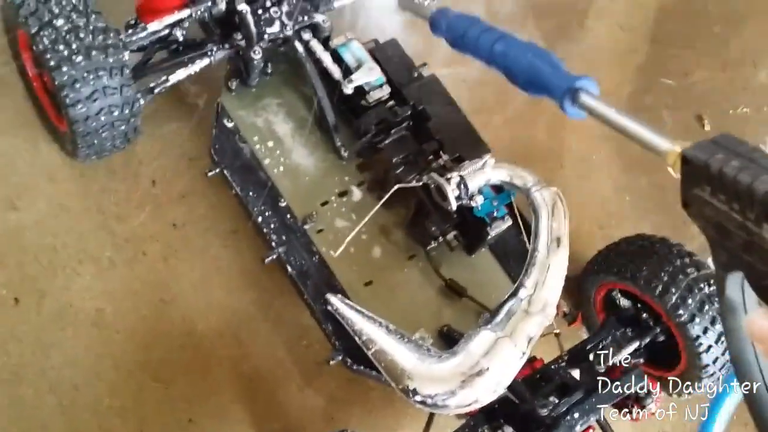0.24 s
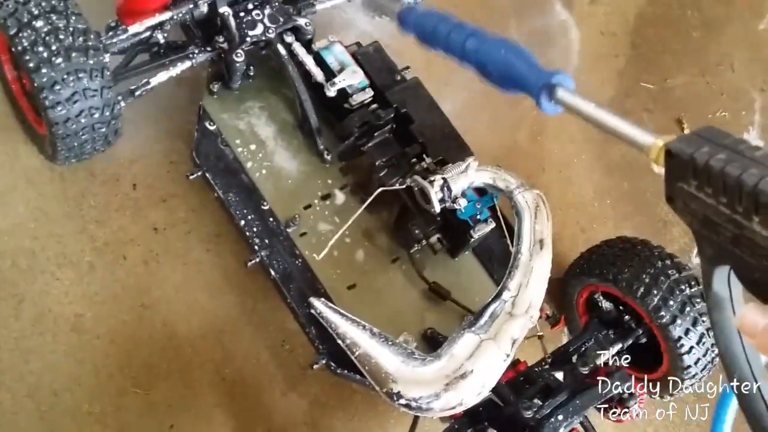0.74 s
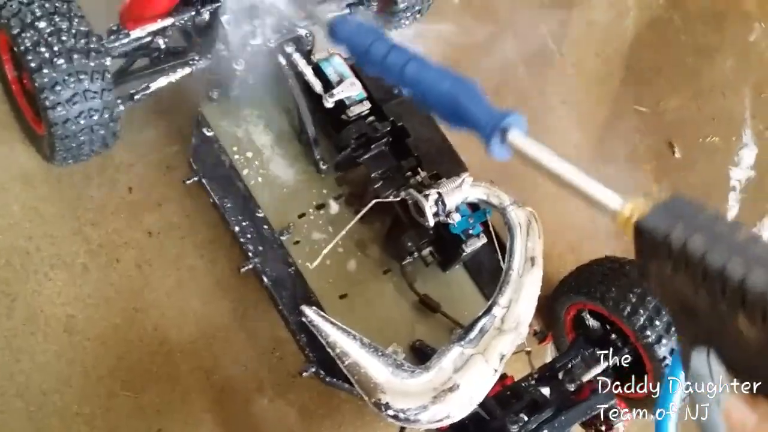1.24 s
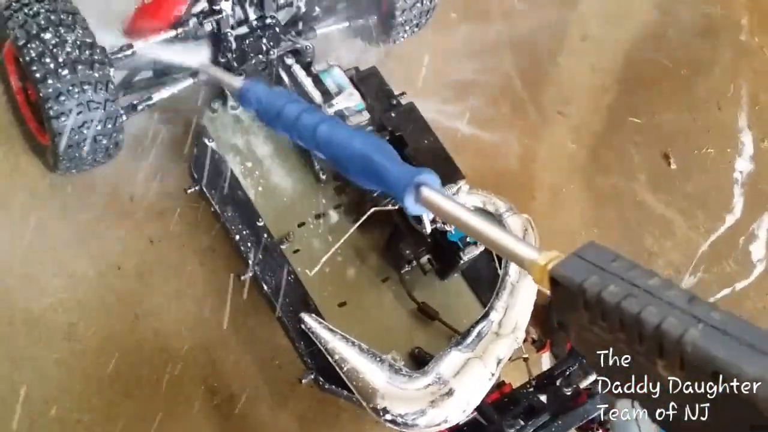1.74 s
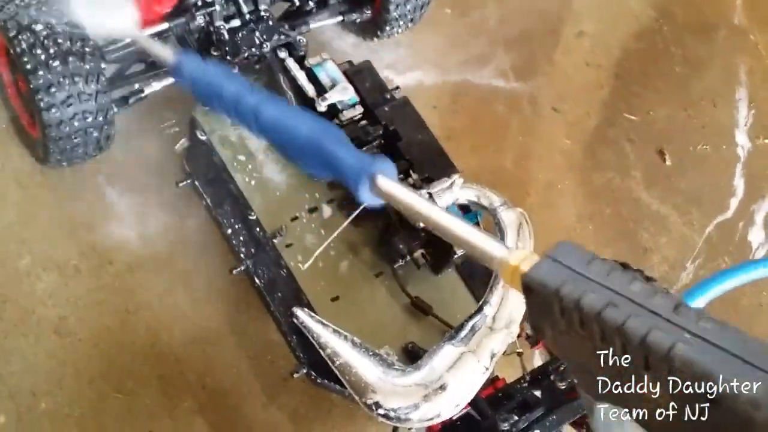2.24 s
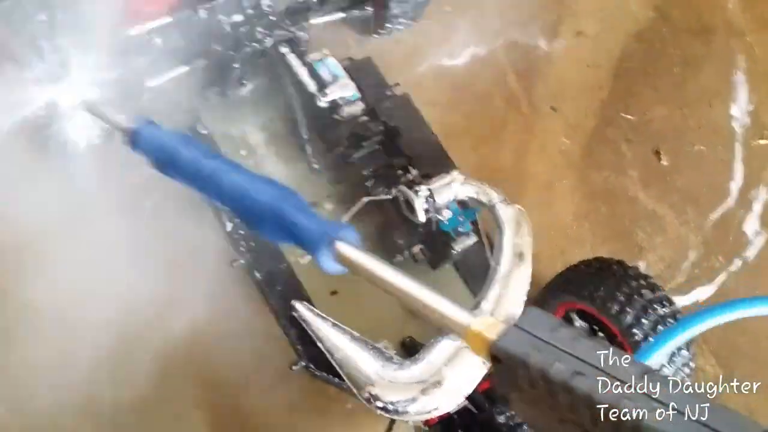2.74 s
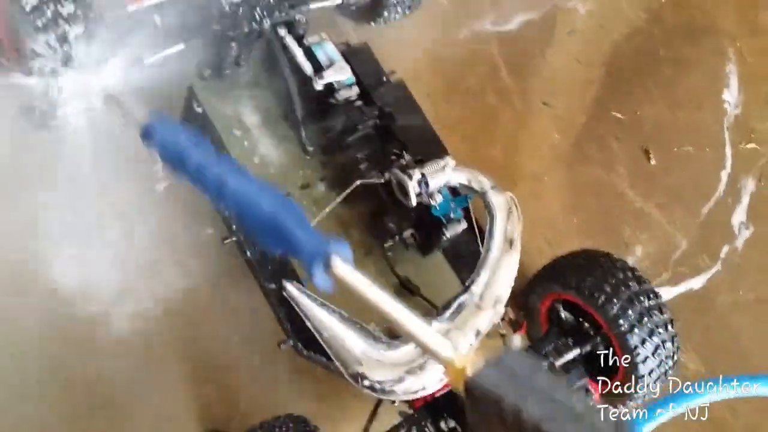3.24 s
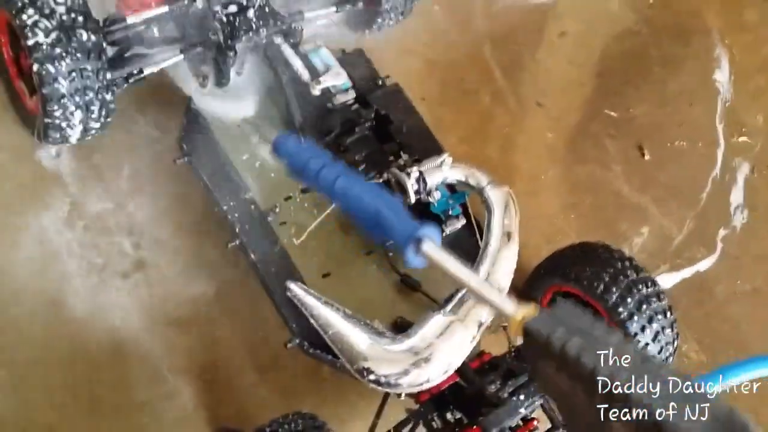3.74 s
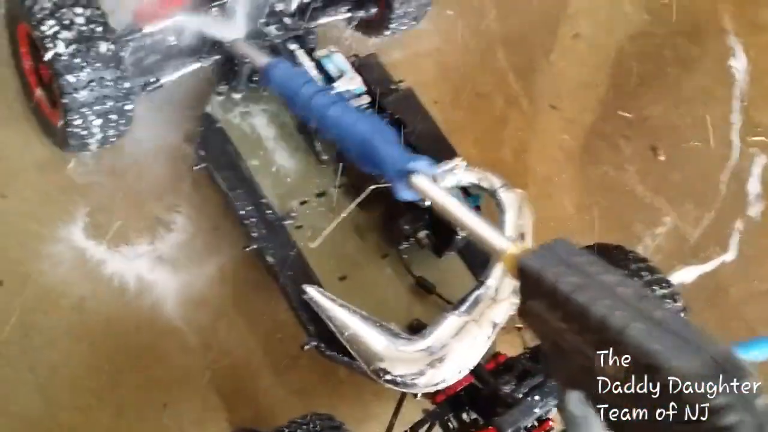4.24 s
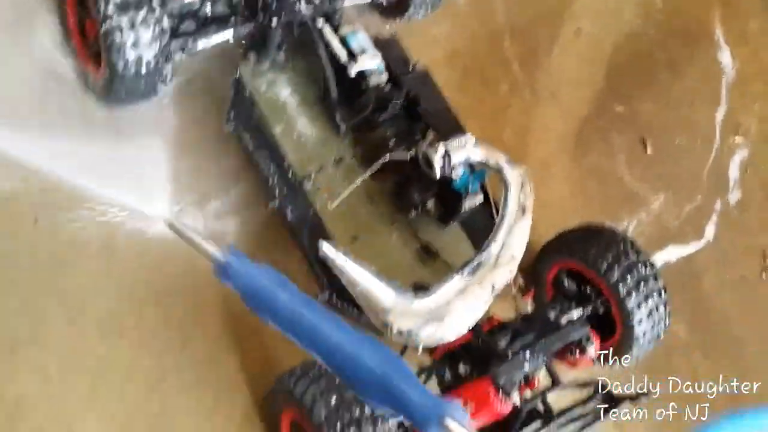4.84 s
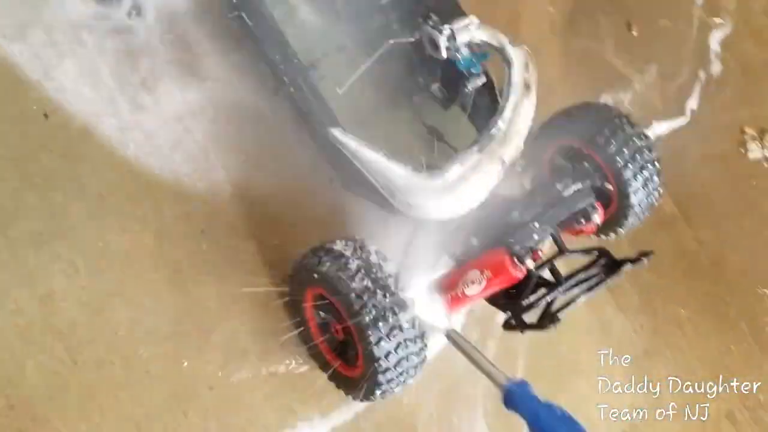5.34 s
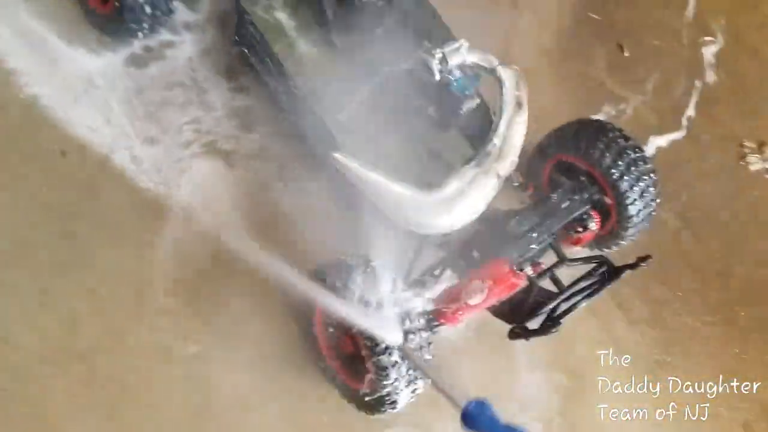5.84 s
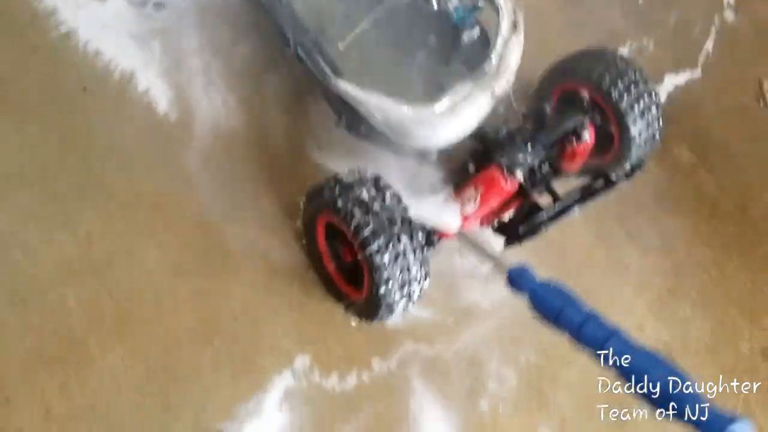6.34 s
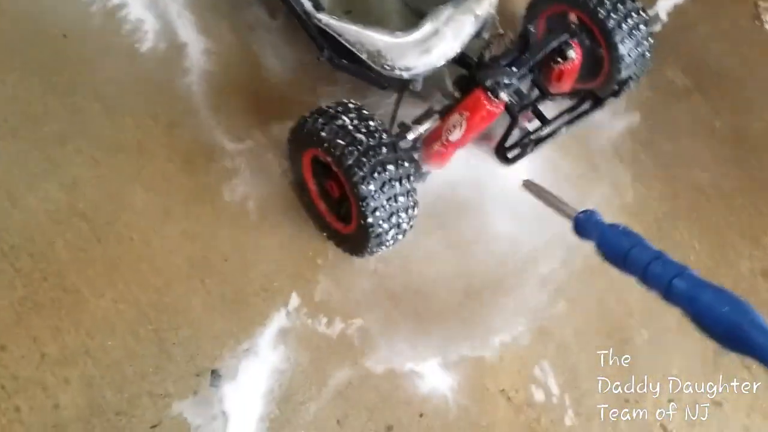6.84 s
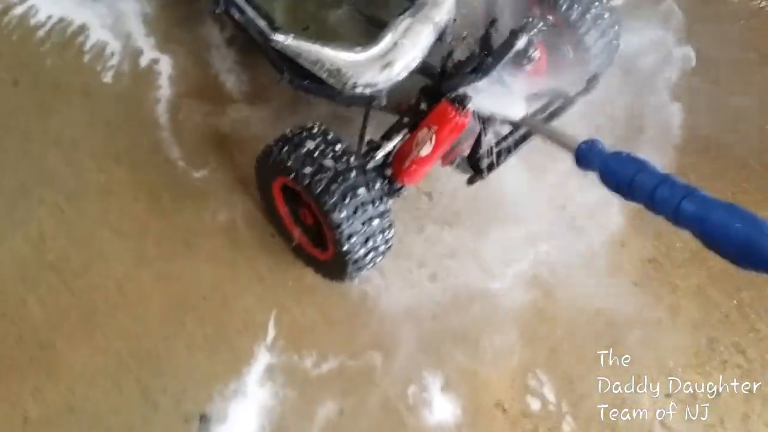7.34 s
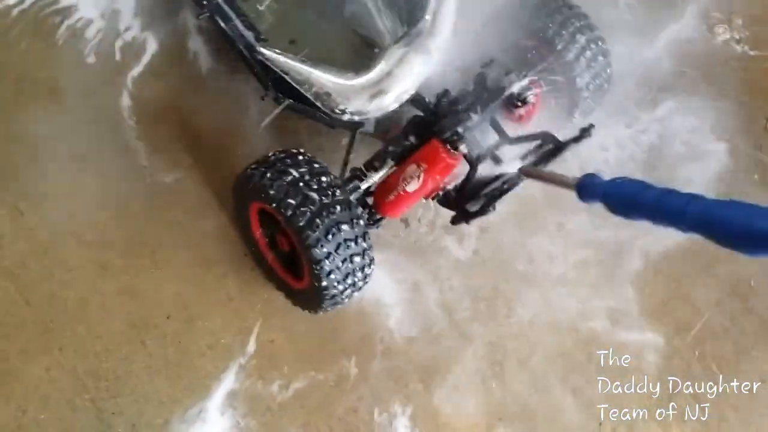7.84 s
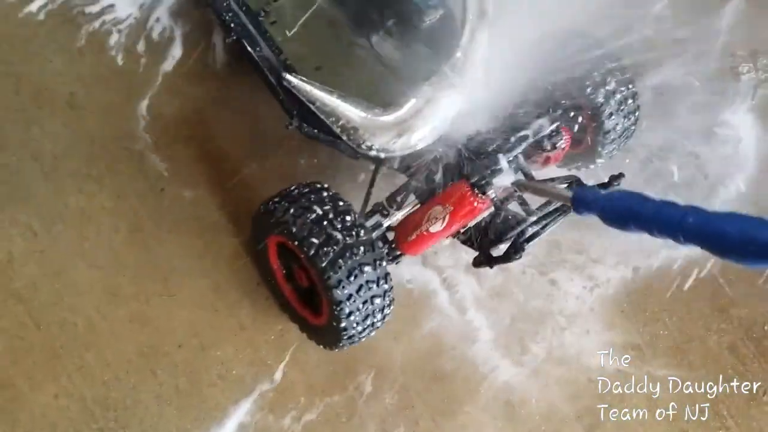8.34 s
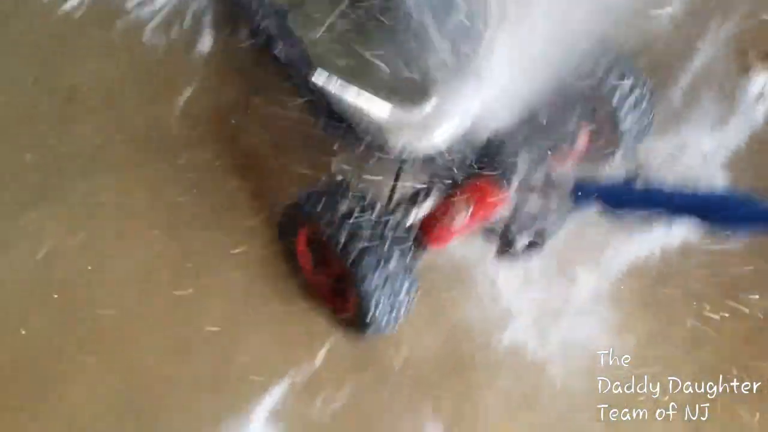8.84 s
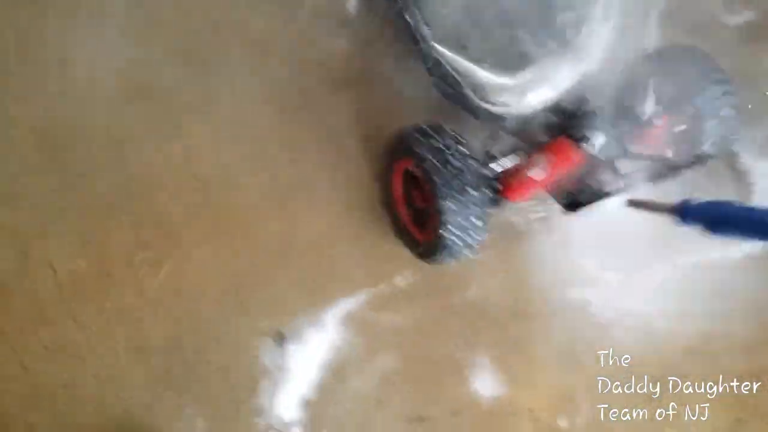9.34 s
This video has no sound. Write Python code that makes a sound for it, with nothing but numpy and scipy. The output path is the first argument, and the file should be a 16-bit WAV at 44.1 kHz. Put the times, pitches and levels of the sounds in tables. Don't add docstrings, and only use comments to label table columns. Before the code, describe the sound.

A pressure washer jet plays over a small model car on wet concrete, heard very close through a hand-held stereo phone. From the start a dense, bright hiss fills both sides, brighter on the right, quivering about thirteen times a second with the pump strokes. Through the first 2.7 seconds the jet passes in and out of chassis hollows, adding spluttering mid-pitched roars and dull tray drumming around 0.7 and 1.6, with a low air puff near 2.3. Around 3 it only grazes, finer and thinner, then roars and drums again from 3.5 to 4.5. From 4.7 to 6.2 the hollow roar recedes, leaving fluctuating spray while a low motor hum and rumble rise. At 6.3 the hum drops and roaring returns in quick bursts, strongest near 7.4, continuing to about 9.2. At the end the spray thins and the pump hum comes back.

```python
import sys
import numpy as np
from scipy import signal
from scipy.io import wavfile
from scipy.ndimage import uniform_filter1d, map_coordinates

SR = 44100
rng = np.random.default_rng(int(sys.argv[2]) if len(sys.argv) > 2 else 0)


def ratio(d):
    e = np.asarray(d, float) / 20
    return 10 ** e


def materialize(psi):
    bounded = np.clip(np.atleast_2d(psi).T, -1, 1)
    quanta = np.round(bounded * 32767).astype(np.int16)
    wavfile.write(sys.argv[1], SR, quanta)


N = 423360
FRAME, HOP = 512, 192
HZ = np.fft.rfftfreq(FRAME, 1 / SR)[:, None] + 1e-3
T = np.arange(-(-N // HOP) + 1) * HOP / SR


# t/s, finest mist level/dB
ATOMISATION = [(0, 3.5), (.8, -2.5), (1.5, 2), (1.9, -1.5), (2.4, -1), (2.95, 6.5), (3.3, 3.5), (3.6, -2),
               (4.1, 1.5), (4.6, -2.5), (5.35, 0.5), (5.9, 0.5), (6.3, 4), (6.7, -0.5), (7.4, -0.5),
               (7.7, -0.5), (8.4, -1.5), (9.6, 0)]
# t/s, right port resonance f/Hz, left port shadow notch f/Hz, floor-echo notch f/Hz,
# left minus right level of the finest mist/dB
PHONE_TILT = [(0, 8540, 8650, 3900, -9), (1.3, 9050, 8700, 4570, -5.5), (1.7, 8500, 9400, 4300, -7.5),
              (2.4, 8260, 9300, 4560, -7.5), (3.4, 8570, 9000, 4140, -4), (3.8, 8700, 8800, 4470, -9.5),
              (4.3, 8650, 9000, 4370, -9), (4.7, 8340, 9600, 4530, -5.5), (5.3, 8550, 9550, 4570, -7.5),
              (6.2, 8500, 9700, 4200, -7.5), (6.6, 8270, 8900, 4180, -7.5), (8, 8700, 8800, 3970, -8),
              (9.25, 8560, 9300, 4340, -7.5), (9.4, 8700, 8700, 3280, -7)]
# f/Hz, left level/dB, right level/dB
PORT_COLOUR = [(2000, -3.5, -7), (2520, -5.5, -6), (3710, -8, -10), (4200, -13, -9.5), (5850, -9, -10.5),
               (6660, -9.5, -12), (7700, -10.5, -9), (8160, -12, -8), (9400, -26.5, -7.5),
               (10160, -14, -9.5), (11900, -19.5, -11.5), (12560, -19.5, -14.5), (14000, -29.5, -15.5),
               (14000, -23.5, -17.5)]
# t/s, length/s, extra notch depth/dB
ECHO_NULLS = [
    (1.2, 0.19, 7),
    (6.22, .2, 2.5),
    (6.58, 0.16, 6),
    (7.63, .12, 8),
    (8.045, 0.14, 4),
    (9.38, .17, -1),
]


def spray():
    level_db, fine_db = jet()
    edge_fine_db = fine_db - curves(SWEEP)[1]
    finest_db = curves(ATOMISATION)[0] + edge_fine_db + 1.2 * walk(8)[0]
    peak_hz, notch_hz, echo_hz, pan_db = curves(PHONE_TILT)
    left_db, right_db = shape(PORT_COLOUR)

    fine, finest = shape([(6000, 0, 0), (7500, 1, 0), (10000, 1, 0), (12000, 0, 1)])
    tilt_db = 0.67 * fine * (fine_db - fine_db.mean()) + finest * (finest_db - finest_db.mean())
    common_db = 21.5 + level_db + tilt_db + strokes()

    common_db = common_db + 0.6 * walk(13.0)
    common_db = common_db + 1.6 * walk(2.6, bands=24) + 0.38 * walk(30, bands=6) + 1.6 * walk(6, bands=200)

    echo_depth_db = 2.5 + sum(stay(s, length) * db for s, length, db in ECHO_NULLS)
    common_db = common_db - echo_depth_db / (1 + ((HZ - echo_hz) / 220) ** 2)
    left_db = left_db - 5 / (1 + ((HZ - notch_hz) / 350) ** 2)
    right_db = right_db + (5.0 + 1.0 * fine_db) / (1 + ((HZ - peak_hz) / 420) ** 2)
    shade_db = shape([(8500, 0), (10500, 1)])[0] * (pan_db - pan_db.mean())

    thin = 1 / (1 + (2350 / HZ) ** 4)
    left = thin * ratio(common_db + left_db + shade_db + 0.5 * walk(0.83, bands=30))
    return at_ports(left, thin * ratio(common_db + right_db), scatter_db=0.85)


# t/s, level/dB, fineness of the mist/dB
SWEEP = [(0, -24.5, -1), (.6, -24, -.5), (.88, -20.5, -1), (1.3, -20, -2), (1.55, -23, -2.5),
         (1.9, -21.5, -2.5), (2.5, -23, -1), (2.9, -25, 2), (3.42, -25.5, 3.5), (3.65, -24.5, -1.5),
         (4.2, -23.5, -2), (4.27, -28.5, -2.5), (4.82, -30.5, -2.5), (5.3, -24, 1), (6.2, -27.5, 3.5),
         (6.45, -23, 0.5), (9.1, -23.5, 0.5), (9.6, -29, 2.5)]
# t/s, change of level/dB, change of fineness/dB
EDGE_HITS = [(.16, 2, 1), (1.1, 2, 0), (1.84, 1.5, -0.5), (2.1, -1.5, 1), (2.3, 2, 0), (2.67, 2, -1),
             (3.23, 1, -0.5), (4.41, 3, 1), (4.49, -2, 1.5), (4.6, 1, 4.5), (5.35, -3, 4.5), (5.46, 1, 3.5),
             (5.67, -2, 2.5), (5.55, -1, -0.5), (6.31, 1, 1.5), (6.52, 1, 2), (6.62, 2.5, -0.5),
             (6.9, -0.5, 1), (7.19, -1.5, 1), (7.4, 1.5, -0.5), (7.7, -4.5, 3.5), (7.85, 0.5, -1.5),
             (8.1, -1.5, 1), (8.56, 2, -2.5), (8.75, 1, 0), (8.92, 3, -0.5), (9.02, 0, 3.5), (9.42, 1.5, 1)]


def jet():
    level_db, fine_db = curves(SWEEP)
    s, bump_db, finer_db = np.transpose(EDGE_HITS)
    near = np.exp(-((T - s[:, None]) / 0.039) ** 2)
    return level_db + bump_db @ near, fine_db + finer_db @ near


def strokes():
    return 0.76 * np.sin(2 * np.pi * STROKE_HZ * T + 3.7)


# f/Hz, width/Hz, level/dB
TRAY_MODES = [(560, 50, -8), (1110, 150, -7), (1680, 200, -12)]


def hollows():
    level_db, hz, boom_db, over_db = cavity()
    splutter_db = 1.0 * walk(28) + 0.93 * strokes()
    wobble = ratio(.3 * walk(12))
    ring = resonance(hz * wobble, 830) * ratio(2.0)
    overtone = resonance(900 + 0.83 * hz, 1550) * ratio(over_db - 2.5)
    boom = resonance(778, 1080) * ratio(boom_db + 4.0 + .5 * walk(17.0))
    tray_power = 0
    for f, width, db in TRAY_MODES:
        mode_db = db + 1.5 * walk(5) + (f < 800) * (boom_db + 4)
        tray_power = tray_power + (resonance(f, width) * ratio(mode_db)) ** 2
    gain = np.sqrt(ring ** 2 + overtone ** 2 + boom ** 2 + tray_power)
    gain = gain * ratio(level_db + splutter_db + 2.07 * walk(10, bands=120))
    return lean_to_ports(gain, scatter_db=0.7)


# t/s, length/s, level/dB, resonance f/Hz, deep boom level/dB
HOLLOW_PASSES = [(0.03, 0.58, -30, 1240, -6), (0.665, 0.26, -20.5, 1220, -11.5),
                 (0.986, 0.1, -21.5, 1110, -15), (1.13, 0.19, -34, 1400, -7), (1.353, 0.12, -19, 1610, -31),
                 (1.523, .5, -29.5, 1290, -11), (2.007, 0.29, -24, 1270, -8.5),
                 (2.488, 0.21, -24.5, 1420, -11.5), (3.493, 0.2, -25, 1180, -8.5),
                 (3.607, 0.22, -28.5, 1230, -5), (3.885, 0.11, -21.5, 1380, -30),
                 (4.02, .24, -28, 1440, -13), (6.277, 0.23, -26, 1310, -5.5),
                 (6.53, 0.38, -26.5, 1180, -6.5), (6.967, 0.17, -23, 1240, -8.5),
                 (7.247, 0.15, -22, 1400, -8.5), (7.39, 0.14, -19, 1310, -10.5),
                 (7.818, 0.11, -20.5, 1330, -13.5), (7.978, 0.084, -27, 1320, -4),
                 (8.132, 0.1, -30, 1400, -5), (8.295, 0.35, -24, 1250, -9), (8.62, 0.34, -25, 1430, -9),
                 (8.97, 0.16, -29.5, 1380, -3.5), (9.127, 0.11, -24, 1360, -8.5),]
# t/s, length/s, level/dB
RIM_GRAZES = [(2.93, 0.098, -34.5), (3.3, 0.19, -37), (4.28, 0.22, -35), (5.1, 0.37, -40.5),
              (5.42, 0.22, -36.5), (5.7, 0.22, -33.5), (6.05, 0.27, -33.5), (7.14, .08, -31),
              (7.55, 0.14, -36), (7.67, .12, -35), (9.27, .1, -32), (9.48, 0.1, -29.5)]
# t/s, length/s, overtone level/dB
STRUT_GAPS = [(0.094, 0.49, -25), (0.797, 0.31, -24.5), (1.583, 0.23, -19.5), (1.813, 0.45, -16.5),
              (2.52, 0.13, -17.5), (3.523, .14, -21), (3.964, 0.21, -22.5), (6.365, 0.086, -20.5),
              (7.48, 0.06, -17), (8.4, 0.6, -22.5), (9.096, 0.11, -19.5)]


def cavity():
    s, length, db, hz, boom_db = np.transpose(HOLLOW_PASSES)[:, :, None]
    power = stay(s, length) * ratio(2 * db)
    open_db = jet()[0] - 10 - 0.68 * curves(SWEEP)[1]
    base = ratio(2 * open_db) + visits(RIM_GRAZES)
    total = base + power.sum(axis=0)
    boom = base * ratio(2 * -5.5) + (power * ratio(2 * boom_db)).sum(axis=0)
    over = base * ratio(2 * -4) + visits(STRUT_GAPS)
    pitch = (base * 1400 + (power * hz).sum(axis=0)) / total
    return 10 * np.log10(total), pitch, 10 * np.log10(boom / total), 10 * np.log10(over / total)


def visits(table):
    return sum(stay(s, length) * ratio(2 * db) for s, length, db in table)


def stay(start, length):
    enter_s, drain_s = 0.11, 0.13
    inside = np.minimum((T - start) / enter_s, (start + length - T) / drain_s) + .5
    return np.sin(np.pi / 2 * np.clip(inside, 0, 1)) ** 2


# t/s, length/s, level/dB
TRAY_DRUMMING = [
    (.68, 0.38, -35),
    (1.6, 0.33, -35.5),
    (3.6, 0.11, -27.5),
    (4.25, 0.29, -34.5),
    (7.3, 0.18, -40),
]


def tray():
    mode_hz, width_hz = 557, 73
    b, a = signal.iirpeak(mode_hz, mode_hz / width_hz, fs=SR)
    ring = signal.lfilter(b, a, signal.lfilter(b, a, rng.standard_normal((3, N))))
    ring = ring[0] + 0.37 * ring[1:]
    drumming = np.interp(np.arange(N) / SR, T, np.sqrt(visits(TRAY_DRUMMING)))
    return ring / ring.std() * drumming * ratio(np.array([[-1.5], [0.5]]))


STROKE_HZ = 13.385
# t/s, level/dB
PUMP_PATH = [
    (0, -11.5),
    (2, -13),
    (4.1, -15),
    (4.7, -3.5),
    (5.1, -2.5),
    (6.22, 1.5),
    (6.3, -11),
    (8.9, -14),
    (9.6, 1),
]
# multiple, level/dB
HUM_MULTIPLES = [(2, 2.5), (3, 5), (4, -1)]


def hum():
    open_db = curves(PUMP_PATH)[0]
    hum_db = -45.5 + open_db + 1.5 * walk(6)[0]
    multiples_db = -54 + 0.4 * open_db
    t = np.arange(N) / SR
    motor_hz = 66.8 + 0.17 * np.interp(t, T, walk(1.8)[0])
    phase = 2 * np.pi * np.cumsum(motor_hz) / SR
    tone = np.sin(phase) * ratio(np.interp(t, T, hum_db))
    multiples = sum(ratio(db) * np.sin(k * phase) for k, db in HUM_MULTIPLES)
    tone = tone + multiples * ratio(np.interp(t, T, multiples_db))
    tone = tone + np.sin(8 * np.pi * STROKE_HZ * t) * ratio(-60 + .3 * np.interp(t, T, open_db))
    for k in range(6, 24):
        knock = np.sin(2 * np.pi * (k * STROKE_HZ * t + rng.random()))
        tone = tone + knock * ratio(-69 + 2.5 * rng.standard_normal())
    return tone * ratio(np.array([[1.9], [4.1]]))


# t/s, length/s, rise of the rumble/dB
AIR_PUFFS = [
    (.55, 0.49, 3.5),
    (1.9, .25, 2),
    (2.3, 0.17, 10.5),
    (2.95, .12, 7),
    (7.2, 0.11, 2),
    (7.65, 0.17, 6),
    (8.25, 0.11, 5),
]


def rumble():
    level_db = -40.5 + 0.53 * curves(PUMP_PATH)[0] + 0.31 * (cavity()[0] + 30)
    level_db = level_db + sum(stay(s, length) * db for s, length, db in AIR_PUFFS)
    gain = (resonance(225, 290) + ratio(-30) * resonance(52, 50)) * ratio(level_db + 4.0)
    return lean_to_ports(gain, scatter_db=-3.0)


# f/Hz, left minus right level/dB
LOW_LEAN = [(60, -2), (400, -3.5), (700, -1), (1300, -0.5), (2400, 5)]


def lean_to_ports(gain, scatter_db):
    lean = ratio(shape(LOW_LEAN)[0] / 2)
    return at_ports(gain * lean, gain / lean, scatter_db)


# f/Hz, share of power common to both (0-1)
COMMON_SHARE = [(60, .9), (300, .92), (640, .83), (1200, .56), (2200, .43), (6000, .38), (15000, .36)]
# t/s, left lags right/ms
PORT_LAG = [(0, 0), (1, -.045), (2, -.135), (3, -.16), (3.5, -.16), (3.95, -.07), (4.5, -.16), (5, -.16),
            (5.45, 0), (5.8, -.02), (6.3, .02), (7, .045), (8, .065), (9.6, .065)]


def at_ports(gain_left, gain_right, scatter_db):
    share = np.clip(shape(COMMON_SHARE)[0], 0, 1)
    turn = -2j * np.pi * HZ / 1000
    bend = 1 - 1.2 * np.exp(turn * .25) / (1 + (2460 / HZ) ** 2)
    direct = drops(scatter_db) * np.sqrt(share)
    left = direct * bend * np.exp(turn * curves(PORT_LAG)[0]) + drops(scatter_db) * np.sqrt(1 - share)
    left = left / np.sqrt(share * abs(bend) ** 2 + 1 - share)
    right = direct + drops(scatter_db) * np.sqrt(1 - share)
    frames = np.array([left * gain_left, right * gain_right])
    return signal.istft(frames, nperseg=FRAME, noverlap=FRAME - HOP)[1][:, :N]


def drops(scatter_db):
    size = uniform_filter1d(rng.standard_normal(N), size=64) * 10
    x = rng.standard_normal(N) * ratio(scatter_db * size)
    return signal.stft(x / x.std(), nperseg=FRAME, noverlap=FRAME - HOP)[2][:, :len(T)]


def resonance(hz, width_hz):
    g = 1 / (1 + ((HZ ** 2 - hz ** 2) / (HZ * width_hz)) ** 2)
    return g / np.sqrt(np.mean(g ** 2, axis=0))


def walk(rate, bands=1):
    k = max(int(SR / HOP / rate), 1)
    w = rng.standard_normal((bands, len(T)))
    w = uniform_filter1d(uniform_filter1d(w, k, axis=1), k, axis=1)
    if bands == 1:
        return w / w.std()
    place = np.broadcast_arrays(np.linspace(0, bands - 1, len(HZ))[:, None], np.arange(len(T)))
    return map_coordinates(w / w.std(), place, order=1)


def curves(table):
    s, *columns = np.transpose(table)
    return [np.interp(T, s, c) for c in columns]


def shape(table):
    hz, *columns = np.transpose(table)
    return [np.interp(np.log(HZ), np.log(hz), c) for c in columns]


def scene():
    return spray() + hollows() + tray() + hum() + rumble()


def low_pass(x):
    return signal.sosfilt(signal.butter(12, 15500, fs=SR, output="sos"), x)


def record(dry):
    x = signal.sosfilt(signal.butter(2, 42, "high", fs=SR, output="sos"), dry)
    mix = np.tanh(0.63 * x) / 0.79
    return low_pass(mix)


dry = scene()
out = record(dry)
materialize(out)
```